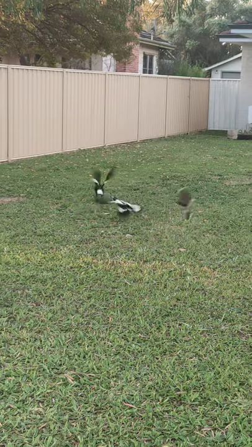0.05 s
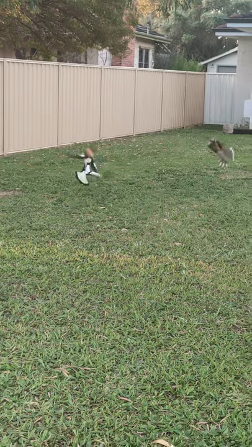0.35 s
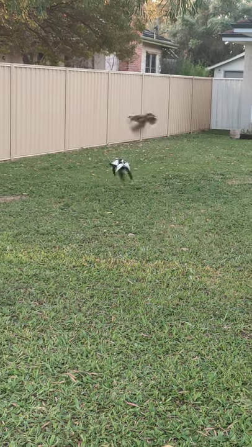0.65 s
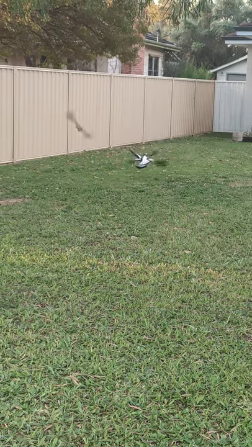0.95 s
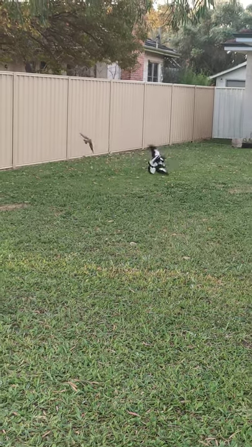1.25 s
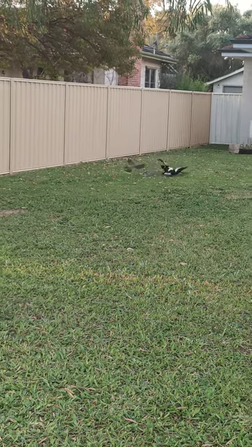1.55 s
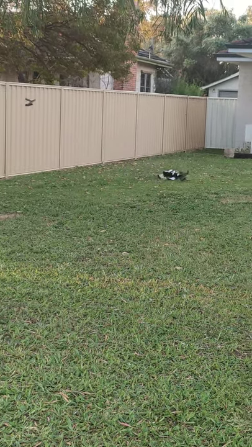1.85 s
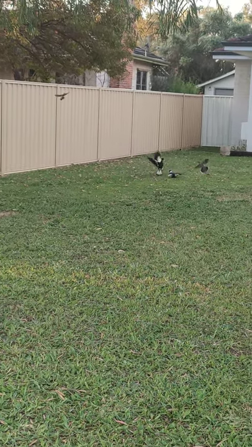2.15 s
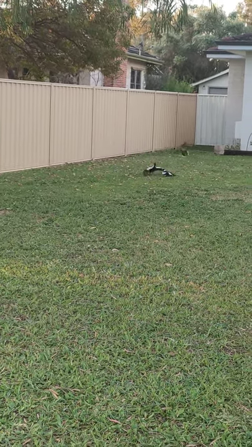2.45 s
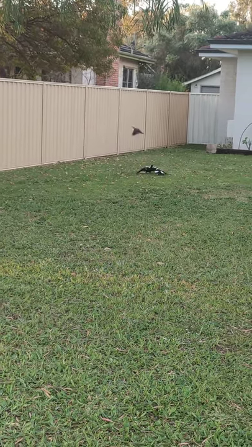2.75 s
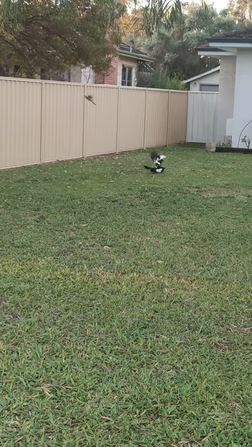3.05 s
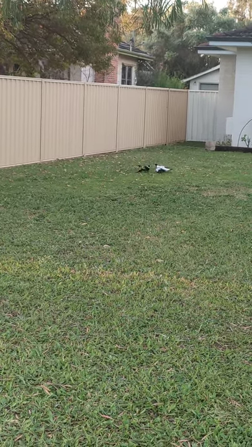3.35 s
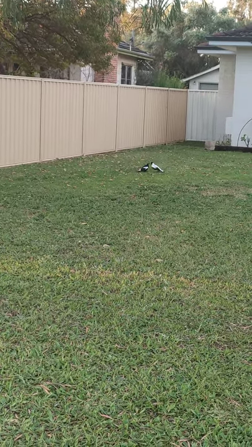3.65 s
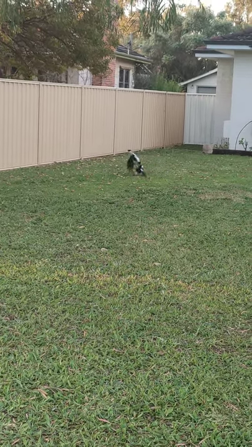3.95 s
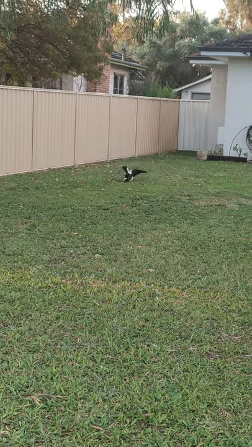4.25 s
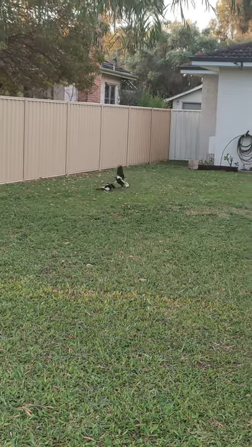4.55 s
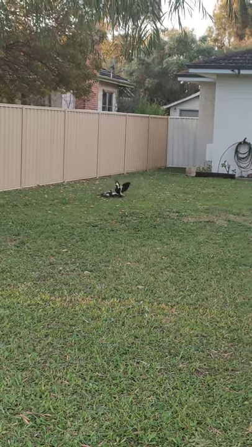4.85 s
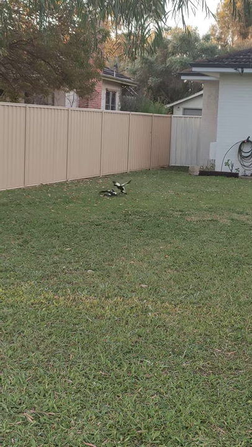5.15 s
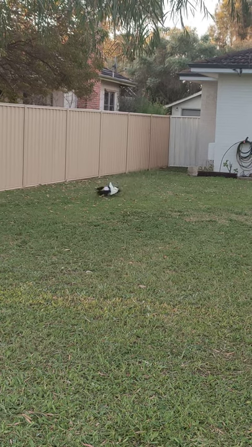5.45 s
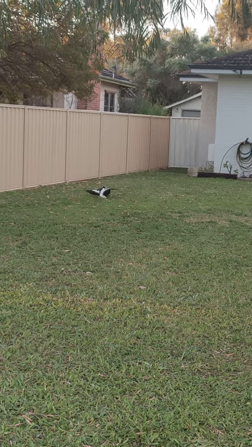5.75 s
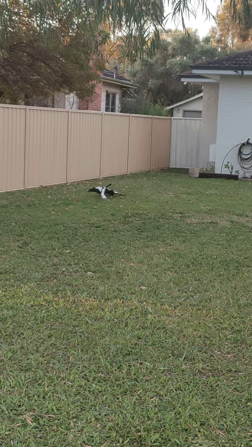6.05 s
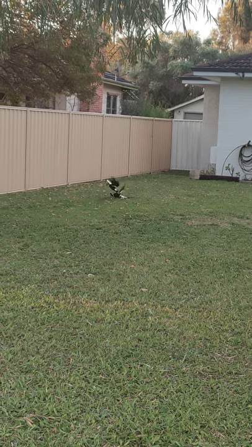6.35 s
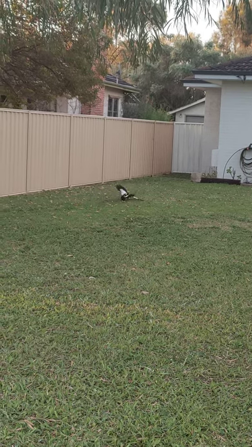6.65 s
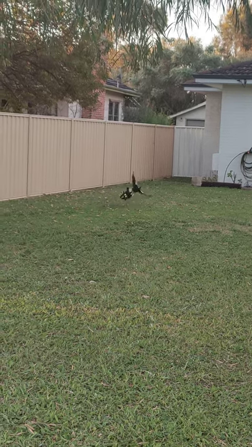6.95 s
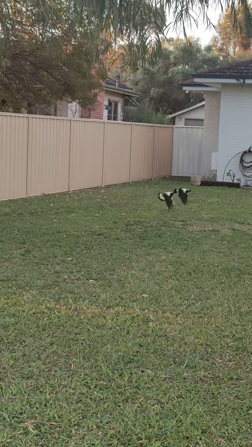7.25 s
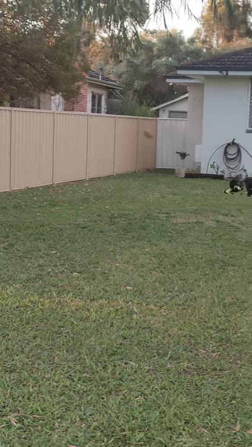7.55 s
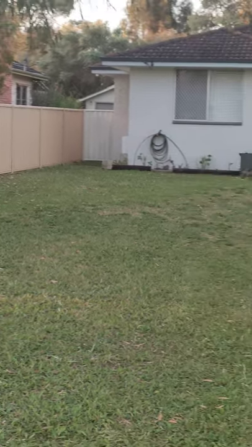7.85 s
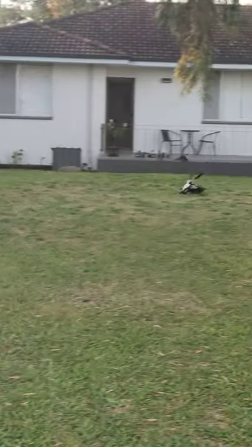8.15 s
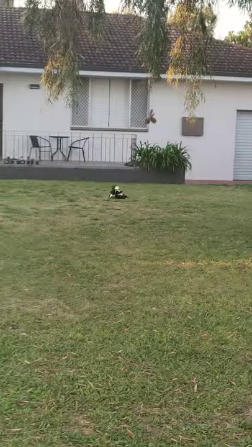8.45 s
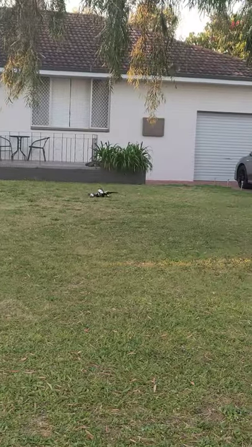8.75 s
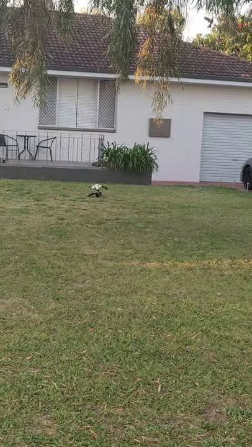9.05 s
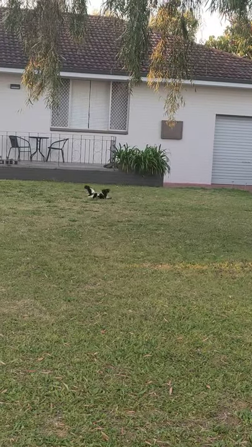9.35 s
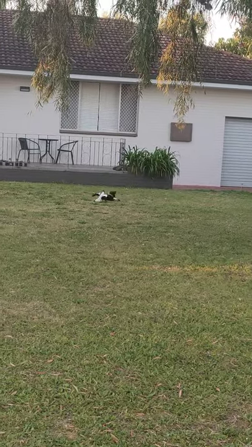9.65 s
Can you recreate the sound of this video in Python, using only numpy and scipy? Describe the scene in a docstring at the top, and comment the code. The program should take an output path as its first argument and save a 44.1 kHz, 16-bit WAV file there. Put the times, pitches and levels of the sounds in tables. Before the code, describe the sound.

Two magpies fight on a suburban lawn, opening with harsh squawks and a few soft wingbeats, then raspy grumbles, hisses, small bill snaps and a scream. A run of quick yelps and a few wailing calls follow. Smaller birds keep up sharp alarm notes and thin whistles, busiest near the end. The calls echo lightly off fence and walls, above a faint hush and a distant engine drone.

```python
"""Two magpies scuffle on a fenced suburban lawn, crying, hissing, flapping and snapping their bills.
Each cry is a harmonic source filtered by the throat's resonances and roughened by fast modulation.
Small honeyeaters mob them with nearly pure tones: arched alarm notes, chips and begging whistles.
Fence and house walls reflect the calls; an engine drones far off under the outdoor hush."""
import sys
import numpy as np
from scipy import signal
from scipy.fft import rfft, irfft
from scipy.io import wavfile
from scipy.ndimage import uniform_filter1d

SR = 44100
rng = np.random.default_rng(int(sys.argv[2]) if len(sys.argv) > 2 else 0)


def dump(signal):
    """Clip the signal to [-1, 1] and save it as 16-bit WAV at the path in sys.argv[1]."""
    limited = np.clip(np.atleast_2d(signal).T, -1, 1)
    pcm = np.round(limited * 32767).astype(np.int16)
    wavfile.write(sys.argv[1], SR, pcm)


N = 432180
T = np.arange(N) / SR
CUTOFF_HZ = 15700
FULL_VOICE_DB = -13.5   # source level of a magpie call at full effort

# Spectrum of breath through an open bill. Each row: frequency in Hz, gain in dB.
BREATH_SPECTRUM = [(200, -19), (700, -5), (1400, 1.5), (2500, 2), (4300, -1), (5700, -32), (7400, -19),
                   (9000, -21), (11500, -23.5), (15500, -29)]
# Resonances of a honeyeater's throat. Each row: frequency in Hz, gain in dB.
HONEYEATER_THROAT = [(2600, 1), (3000, 5.5), (3400, -1), (3950, 4.5), (4500, 2.5), (5100, -15.5),
                     (8000, -6.5), (11500, -7.5), (15000, -16)]
# A honeyeater's source spectrum. Each entry: level of a harmonic in dB, fundamental first.
HONEYEATER_HARMONICS = [0, -13.5, -14.5]


def from_db(db):
    """Amplitude ratio of a level in decibels."""
    return 10 ** (np.asarray(db) / 20)


def along(rows, t):
    """Each column of a curve, interpolated at times t."""
    times, *columns = np.transpose(rows)
    return [np.interp(t, times, column) for column in columns]


def gain_at(spectrum, hz):
    """Amplitude gain of a spectrum, interpolated in dB over log frequency."""
    points_hz, db = np.transpose(spectrum)
    return from_db(np.interp(np.log(hz + 1), np.log(points_hz), db))


def noise(spectrum, size):
    """White noise filtered to a spectrum, falling steeply beyond its ends; rms 1."""
    hz = np.arange(size // 2 + 1) * SR / size + 1
    edges = 1 / (1 + (spectrum[0][0] / hz) ** 8) / (1 + (hz / spectrum[-1][0]) ** 8)
    shaped = irfft(rfft(rng.standard_normal(size)) * gain_at(spectrum, hz) * edges, size)
    return shaped / np.sqrt(np.mean(shaped ** 2) + 1e-20)


def wobble(t, rate):
    """Random modulation: straight lines between `rate` Gaussian values a second."""
    position = (t - t[0]) * rate
    count = int(position[-1]) + 2
    return np.interp(position, np.arange(count), rng.standard_normal(count))


def span(start, length):
    """Sample times of one event, in seconds."""
    return np.arange(int(start * SR), int((start + length) * SR)) / SR


def gate(t, attack_s, release_s):
    """Envelope with a raised-cosine start and end."""
    ramp = np.minimum((t - t[0]) / attack_s, (t[-1] - t) / release_s)
    return np.sin(np.pi / 2 * np.clip(ramp, 0, 1)) ** 2


def add(out, t, sound):
    """Superpose a sound at its time."""
    i = round(t[0] * SR)
    out[i:i + len(sound)] += sound[:max(N - i, 0)]


def phase_of(hz):
    """Phase is the integral of frequency."""
    return 2 * np.pi * np.cumsum(hz) / SR


def glide(t, start_hz, end_hz, curve):
    """Power-law glide: the pitch moves quickly at first, then settles."""
    return end_hz + (start_hz - end_hz) * np.linspace(1, 0, len(t)) ** curve


def hush(near_db=5.5, retreat_s=2.3):
    """Broadband noise of far traffic, grass and foliage; the rustle fades as the birds tumble away."""
    # Three noise spectra. Each row: frequency in Hz, gain in dB.
    traffic_spectrum = [(52, -1), (120, 1), (190, 1), (280, 0.5), (400, -8), (650, -9)]
    grass_spectrum = [(600, 5), (850, 5.5), (1700, 1), (2300, -4.5), (4300, -8.5), (5000, -13)]
    leaf_spectrum = [(7000, -5.5), (9000, -5), (11000, -6), (14000, -3.5), (15500, -14)]
    swell_db = near_db * np.exp(-T / retreat_s) + wobble(T, 13)
    traffic = from_db(-34 + wobble(T, 10)) * noise(traffic_spectrum, N)
    grass = from_db(-39 + swell_db) * noise(grass_spectrum, N)
    leaves = from_db(-50 + swell_db / 2) * noise(leaf_spectrum, N)
    return traffic + grass + leaves


def engine(steady_db=-30, load_db_per_hz_per_s=2):
    """Harmonics of a far engine's cycle swell under load and as they cross the exhaust resonances."""
    # The engine slows, holds, then picks up. Each row: time in seconds, cycle rate in Hz.
    speed_curve = [(.3, 42.36), (2.6, 40.8), (5.1, 30.71), (7.3, 30.66), (9.3, 35.52), (9.8, 36.14)]
    # Exhaust resonances. Each row: frequency in Hz, gain in dB.
    exhaust = [(60, -18), (80, -25.5), (96, -6.5), (125, -18.5), (150, -8.5), (172, -7.5), (215, -14.5),
               (330, -21.5)]
    cycle_hz, = along(speed_curve, T)
    cycle_hz = uniform_filter1d(cycle_hz, size=SR // 2)
    phase = phase_of(cycle_hz)
    db = steady_db + load_db_per_hz_per_s * np.gradient(cycle_hz, T)
    out = np.zeros(N)
    for order in (2, 3, 4, 6, 9):
        gain = from_db(db + wobble(T, 8)) * gain_at(exhaust, order * cycle_hz)
        out += np.sqrt(2) * gain * np.sin(order * phase + rng.uniform(0, 2 * np.pi))
    return out


def soft_thumps(length_s=.038):
    """Short, dull noise bursts: a knock on the handheld camera at the start, then wingbeats."""
    # The first two are the knock. Each row: start in seconds, level in dB.
    thumps = [(.3, -23.5), (.36, -23), (.8, -25), (0.909, -24.5), (1.04, -24)]
    spectrum = [(70, -8), (250, -14.5), (600, -14), (5000, -27.5)]   # Hz, dB
    out = np.zeros(N)
    for start, db in thumps:
        t = span(start, length_s)
        add(out, t, from_db(db) * gate(t, length_s / 2, length_s / 2) * noise(spectrum, len(t)))
    return out


def magpie_voice(t, hz, overtones_db, rasp, half_db, flutter_hz=168):
    """Source and filter: flutter modulates a harmonic tone; period doubling adds half harmonics."""
    # Throat resonances. Each row: frequency in Hz, gain in dB.
    throat = [(400, -22), (750, 2), (1100, -12), (1400, 1), (2450, 5.5), (3100, -13.5), (3700, -16),
              (4500, -8.5), (5500, -29.5), (7300, -21), (8500, -23), (11500, -27), (15000, -40)]
    flutter = np.sin(phase_of(flutter_hz * (1 + .25 * wobble(t, 151))))
    drift = .013 * wobble(t, 45)
    roughness = rasp * (.024 * flutter + .075 * wobble(t, 1100))
    hz = hz * (1 + drift + roughness)
    phase, tone = phase_of(hz), 0
    for k in np.arange(1, 23) / 2:
        db = overtones_db * (k != 1) + half_db * (k % 1 > 0) + 2.5 * wobble(t, 90)
        gain = from_db(db) * gain_at(throat, k * hz) * (k * hz < CUTOFF_HZ)
        tone += gain * np.sin(k * phase + rng.uniform(0, 2 * np.pi))
    breath = rasp * from_db(-10 + overtones_db / 2) * noise(throat, len(t))
    return (np.sqrt(2) * tone + breath) * (1 + .39 * rasp * flutter)


def squawks(end_hz=1314):
    """A magpie's pitch sags as the driving pressure drops; weak squawks are thinner and hoarser."""
    # Each row: start in seconds, length in seconds, starting pitch in Hz, source level in dB.
    calls = [(.376, .205, 1906, -15), (0.549, 0.14, 1506, -22.5), (1.029, .055, 1548, -16),
             (2.24, .19, 1702, -25), (2.427, 0.086, 1464, -15.5), (4.57, .125, 1726, -16.5),
             (4.884, .11, 1722, -15.5), (7.8, 0.07, 1635, -25), (8.382, 0.042, 1900, -32.5)]
    out = np.zeros(N)
    for start, length, start_hz, db in calls:
        t = span(start, length)
        slack_db = FULL_VOICE_DB - db
        hz = glide(t, start_hz, end_hz, curve=1.15)
        voice = magpie_voice(t, hz, overtones_db=-14 + .59 * slack_db,
                             rasp=.598 + .028 * slack_db, half_db=-22)
        add(out, t, from_db(db) * gate(t, .026, .0078) * voice)
    return out


def fluted_notes():
    """Weak overtones and shallow modulation leave a magpie's glide nearly sinusoidal."""
    # Each row: start and length in seconds, starting and final pitch in Hz, source level in dB.
    notes = [(0.691, 0.05, 1840, 1547, -14.5), (0.726, 0.032, 1576, 1828, -20),
             (1.292, 0.045, 2765, 2130, -24), (1.582, 0.039, 1730, 1960, -32.5),
             (1.903, 0.079, 1950, 1493, -33), (2.12, 0.042, 2520, 2170, -36),
             (3.68, 0.041, 3120, 1954, -34), (4.149, 0.0275, 2460, 1960, -36),
             (6.691, 0.14, 1351, 1326, -26), (8.979, 0.0276, 2440, 1880, -38.5)]
    out = np.zeros(N)
    for start, length, start_hz, end_hz, db in notes:
        t = span(start, length)
        hz = glide(t, start_hz, end_hz, curve=2.38)
        voice = magpie_voice(t, hz, overtones_db=-27, rasp=.17, half_db=-13)
        add(out, t, from_db(db) * gate(t, .0033, .0047) * voice)
    return out


def honeyeater_voice(t, hz, harmonics_db, throat, jitter):
    """Source and filter: a nearly pure tone with pitch jitter; each harmonic shimmers on its own."""
    hz = hz * (1 + jitter * wobble(t, 900) + .007 * wobble(t, 70))
    phase, tone = phase_of(hz), 0
    for k, db in enumerate(harmonics_db, 1):
        gain = from_db(db + 2.5 * wobble(t, 170)) * gain_at(throat, k * hz) * (k * hz < CUTOFF_HZ)
        tone += gain * np.sin(k * phase)
    return np.sqrt(2) * tone


def begging_whistles():
    """Slow frequency modulation lifts a thin note, then bends it down; no two bend quite alike."""
    # Each row: time of the bend in seconds, reference pitch in Hz, source level in dB.
    notes = [(0.757, 5920, -25), (1.523, 5980, -27), (2.843, 5730, -24.5), (3.763, 5940, -25.5),
             (3.915, 6220, -22.5), (4.618, 5950, -23), (5.327, 5760, -24), (5.653, 6400, -27),
             (6.022, 5840, -19), (6.071, 6410, -24), (6.429, 6290, -26), (6.822, 5914, -20.5),
             (6.976, 6320, -23), (7.125, 6120, -20.5), (7.237, 5880, -23.5), (7.884, 6070, -27),
             (8.799, 5880, -22), (8.967, 6470, -27), (9.208, 5860, -20.5), (9.341, 6280, -27)]
    # Mean contour. Each row: time from the bend in seconds, pitch ratio, gain in dB.
    contour = [(-.078, .94, -44), (-.066, 0.95, -1.5), (-.03, 0.95, 0), (0, 0.98, 3.5), (0.013, 0.94, 1.5),
               (.03, .87, 0.5), (.042, 0.8246, 5), (.056, 0.88, -11.5)]
    # Each entry: source level of a harmonic in dB, fundamental first.
    harmonics_db = [0, -16.5]
    throat = [(4800, 3), (5400, -12), (6200, -6.5), (12000, .5)]   # Hz, dB
    first_s, last_s = contour[0][0], contour[-1][0]
    out = np.zeros(N)
    for bend, reference_hz, db in notes:
        stretch, depth = 1 + .1 * rng.uniform(-1, 1, 2)
        t = span(bend + stretch * first_s, stretch * (last_s - first_s))
        ratio, swell_db = along(contour, (t - bend) / stretch)
        voice = honeyeater_voice(t, reference_hz * ratio ** depth, harmonics_db, throat, jitter=.012)
        add(out, t, from_db(db + swell_db) * gate(t, .004, .004) * voice)
    return out


def moans(fall_ratio=.85):
    """Faint overtones and deep modulation make a magpie's low, drooping note dull and rough."""
    # Each row: start in seconds, length in seconds, starting pitch in Hz, source level in dB.
    calls = [(0.784, 0.0413, 1320, -14), (6.26, 0.12, 1195, -28), (8.743, 0.088, 795, -37.5),
             (9.528, .098, 993, -30), (9.738, 0.062, 1040, -26.5)]
    out = np.zeros(N)
    for start, length, start_hz, db in calls:
        t = span(start, length)
        hz = glide(t, start_hz, fall_ratio * start_hz, curve=1.526)
        voice = magpie_voice(t, hz, overtones_db=-31, rasp=.76, half_db=-19)
        add(out, t, from_db(db) * gate(t, .013, .0056) * voice)
    return out


def hisses():
    """Turbulent breath through an open bill gives a harsh burst of broadband noise."""
    # Each row: start in seconds, length in seconds, level in dB, lift above 5 kHz in dB.
    bursts = [(0.803, 0.028, -27, 7), (3.559, 0.041, -28, 2), (4.317, 0.0596, -23, 13),
              (6.956, 0.018, -27, 26)]
    out = np.zeros(N)
    for start, length, db, treble_db in bursts:
        t = span(start, length)
        spectrum = [(hz, level + treble_db * (hz > 5000)) for hz, level in BREATH_SPECTRUM]
        breath = noise(spectrum, len(t)) * from_db(3 * wobble(t, 340))
        add(out, t, from_db(db) * gate(t, .002, .0031) * breath)
    return out


def grumbles(pitch_hz=1600, wander=.24, trim_db=-4):
    """At low effort a magpie's voice is barely periodic: mostly rasp and air, with wandering pitch."""
    # Each row: start in seconds, length in seconds, relative level in dB.
    calls = [(0.934, 0.13, -33), (1.008, 0.16, -30), (1.348, 0.2, -29.5), (1.58, 0.1, -33.5),
             (1.722, 0.16, -29), (2.152, 0.185, -32.5), (3.101, 0.26, -31), (3.689, 0.14, -31),
             (3.999, 0.15, -37.5), (4.837, 0.053, -18), (5.04, 0.046, -22.5), (7.05, 0.052, -25.5),
             (8.736, .14, -37.5)]
    out = np.zeros(N)
    for start, length, db in calls:
        t = span(start, length)
        hz = pitch_hz * np.exp(wander * wobble(t, 70))
        voice = magpie_voice(t, hz, overtones_db=0, rasp=.887, half_db=-3)
        breath = from_db(-1) * noise(BREATH_SPECTRUM, len(t))
        add(out, t, from_db(db + trim_db) * gate(t, .015, .031) * (voice + breath))
    return out


def alarms(rest_hz=2880, fall_s=.0185):
    """A honeyeater's pitch shoots up and back, flaring each time it crosses a throat resonance."""
    # Each row: time of the top in seconds, top pitch in Hz, rise time in seconds, source level in dB.
    notes = [(1.799, 5360, 0.019, -13.5), (2.345, 5390, .023, -14.5), (3.172, 5060, 0.023, -19.5),
             (4.923, 5220, 0.021, -14.5), (5.66, 5230, .027, -14.5), (6.34, 5160, .029, -16),
             (7.404, 5600, 0.022, -14.5), (7.518, 5916, 0.025, -16), (7.829, 5317, 0.026, -15),
             (8.213, 5400, .025, -19), (8.274, 5340, 0.025, -25), (8.381, 5480, 0.029, -16.5),
             (9.518, 5550, 0.025, -15), (9.794, 5300, 0.028, -16)]
    out = np.zeros(N)
    for top, top_hz, rise_s, db in notes:
        lead_s = 2.94 * rise_s
        t = span(top - lead_s, lead_s + 1.52 * fall_s)
        width_s = np.where(t < top, rise_s, fall_s)
        arch = np.exp(-np.abs((t - top) / width_s) ** 1.7)
        hz = rest_hz + (top_hz - rest_hz) * arch
        voice = honeyeater_voice(t, hz, HONEYEATER_HARMONICS, HONEYEATER_THROAT, jitter=.021)
        add(out, t, from_db(db) * gate(t, .054, .01) * ground_bounce(t, voice))
    return out


def ground_bounce(t, sound, reflection=.62):
    """Comb filtering: a flying bird's call interferes with its delayed reflection off the lawn."""
    lag_s = rng.uniform(.0005, .0016) * (1 + .15 * wobble(t, 20))
    delayed = np.interp(t - lag_s, t, sound, left=0)
    return (sound + reflection * delayed) / np.sqrt(1 + reflection ** 2)


def chips_and_slurs(slur_end_hz=2734):
    """One-way frequency sweeps of the honeyeaters: chips shoot upward, slurs sink to a resting pitch."""
    # Each row: start in seconds, length in seconds, starting pitch in Hz, source level in dB.
    chips = [(2.051, 0.06, 3566, -20.5), (3.862, .075, 6230, -25), (5.42, .085, 5000, -19),
             (7.936, 0.072, 4970, -22.5), (8.072, 0.059, 3530, -13), (9.265, 0.081, 6030, -25.5),
             (9.6, 0.055, 5700, -17.5)]
    slurs = [(8.728, 0.088, 3670, -23), (9.432, 0.097, 3196, -24), (9.712, 0.0437, 3200, -20)]
    out = np.zeros(N)
    for notes, rising in ((chips, True), (slurs, False)):
        for start, length, start_hz, db in notes:
            t = span(start, length)
            end_hz = 7040 + .55 * (start_hz - 5000) if rising else slur_end_hz
            hz = glide(t, start_hz, end_hz, curve=1.6)
            voice = honeyeater_voice(t, hz, HONEYEATER_HARMONICS, HONEYEATER_THROAT, jitter=.024)
            add(out, t, from_db(db) * gate(t, .013, .022) * voice)
    return out


def bill_snaps(decay_s=.0089, trim_db=-7):
    """The impact of a closing bill is a dry noise transient that decays exponentially."""
    # Each row: start in seconds, relative level in dB.
    impacts = [(2.073, -15.5), (2.087, -17.5), (3.157, -17), (3.9885, -18.5), (6.9573, -17.5)]
    spectrum = [(900, 2.5), (4000, -10.5), (6000, -20), (11000, -8), (15000, -15)]   # Hz, dB
    out = np.zeros(N)
    for start, db in impacts:
        t = span(start, .02)
        add(out, t, from_db(db + trim_db) * np.exp((t[0] - t) / decay_s) * noise(spectrum, len(t)))
    return out


def scream(high_hz=1692, low_hz=1145, break_s=2.735, slide_s=.038, crest_s=2.78):
    """As a magpie's pitch falls, the second harmonic slides into a throat resonance and takes over."""
    out = np.zeros(N)
    t = span(start=2.58, length=.313)
    hz = low_hz + (high_hz - low_hz) / (1 + np.exp((t - break_s) / slide_s))
    db = FULL_VOICE_DB - np.maximum(36 * (crest_s - t), 70 * (t - crest_s))   # slopes in dB/s
    voice = magpie_voice(t, hz, overtones_db=-2.5, rasp=.57, half_db=-19)
    add(out, t, from_db(db) * gate(t, .025, .031) * voice)
    return out


def yelps(fall_ratio=.71):
    """A magpie's abrupt onset, rich in harmonics, drops fast in pitch; weak yelps are mostly rasp."""
    # Each row: start in seconds, length in seconds, starting pitch in Hz, source level in dB.
    calls = [(4.351, 0.021, 2498, -18.5), (4.715, .029, 1710, -28.5), (4.777, 0.022, 1740, -27),
             (4.846, .042, 2503, -15.5), (5.044, .04, 2318, -14.5), (5.149, 0.036, 2003, -17),
             (5.271, 0.0177, 2250, -17.5), (5.324, 0.038, 2120, -13), (5.497, 0.037, 2102, -14),
             (5.733, 0.038, 2162, -16.5)]
    out = np.zeros(N)
    for start, length, start_hz, db in calls:
        t = span(start, length)
        slack_db = FULL_VOICE_DB - db
        hz = glide(t, start_hz, fall_ratio * start_hz, curve=2.9)
        voice = magpie_voice(t, hz, overtones_db=-2.5 + .49 * slack_db,
                             rasp=.48 + .04 * slack_db, half_db=-11)
        add(out, t, from_db(db) * gate(t, .0029, .0042) * voice)
    return out


def wails(rest_hz=1844, swell_s=.16, swell_db=13, lift_s=.09, lead_s=.0406):
    """A magpie's fundamental swells and clears over steady overtones; pitch peaks before the crest."""
    # Each row: start, length and crest time in seconds, top pitch in Hz, source level at crest in dB.
    calls = [(5.07, 0.26, 5.24, 1887, -19), (7.064, 0.5, 7.205, 1976, -17), (8.034, 0.23, 8.15, 1865, -26)]
    out = np.zeros(N)
    for start, length, crest, top_hz, crest_db in calls:
        t = span(start, length)
        slack = 1 - np.exp(-((t - crest) / swell_s) ** 2)
        db = crest_db - swell_db * slack
        lift = np.exp(-((t - crest + lead_s) / lift_s) ** 2)
        hz = rest_hz + (top_hz - rest_hz) * lift
        voice = magpie_voice(t, hz, overtones_db=-22 - db, rasp=.16 + .69 * slack, half_db=-20)
        add(out, t, from_db(db) * gate(t, .018, .017) * voice)
    return out


def yard(direct, t60_s=.74, build_s=.0099):
    """Convolution adds early reflections and a diffuse tail scattered by houses and trees."""
    # Fence and wall reflections. Each row: delay in seconds, gain in dB.
    reflections = [(.0093, -10.5), (.021, -24.5)]
    # Each row: frequency in Hz, gain of the tail in dB.
    tail_spectrum = [(300, -2.5), (1500, -6), (4000, -7), (6000, -10.5), (12000, -7.5)]
    t = np.arange(SR) / SR
    tail = rng.standard_normal(SR) * from_db(-60 * t / t60_s) * (1 - np.exp(-t / build_s))
    tail /= np.linalg.norm(tail)
    colour = gain_at(tail_spectrum, np.arange(SR // 2 + 1))
    response = irfft(rfft(tail) * colour, SR) * (t < .9)
    for delay, db in reflections:
        response[int(delay * SR)] += from_db(db)
    return direct + signal.fftconvolve(direct, response)[:N]


def scene():
    """Superposition in one channel: birds and thumps reverberate in the yard, over engine and hush."""
    magpies = squawks() + yelps() + wails() + scream() + moans() + fluted_notes() + grumbles()
    honeyeaters = alarms() + chips_and_slurs() + begging_whistles()
    noise_bursts = hisses() + bill_snaps() + soft_thumps()
    return (yard(magpies + honeyeaters + noise_bursts) + engine() + hush())[None]


def record(dry, ceiling=.96):
    """The microphone fades in; soft saturation rounds the peaks and a low-pass filter cuts the top."""
    fade_db, = along([(0, -120), (.19, -70), (.23, -32), (.29, 0)], T)
    faded = dry * from_db(fade_db)
    rounded = faded / (1 + (faded / ceiling) ** 8) ** (1 / 8)
    lowpass = signal.ellip(10, .3, 90, CUTOFF_HZ, fs=SR, output="sos")
    return signal.sosfilt(lowpass, rounded)


dry = scene()
out = record(dry)
dump(out)
```